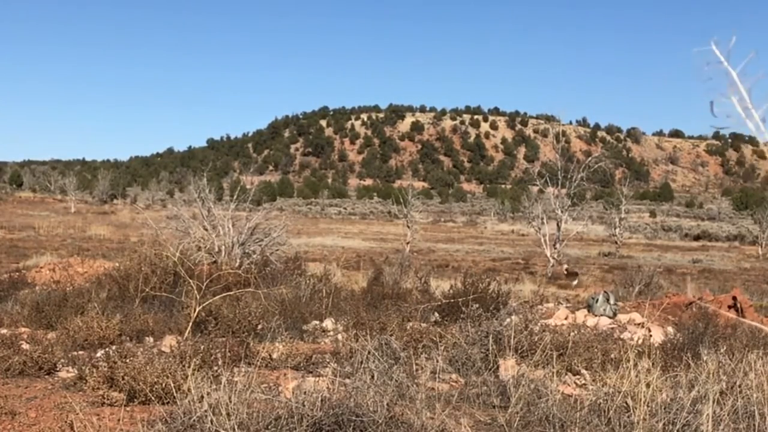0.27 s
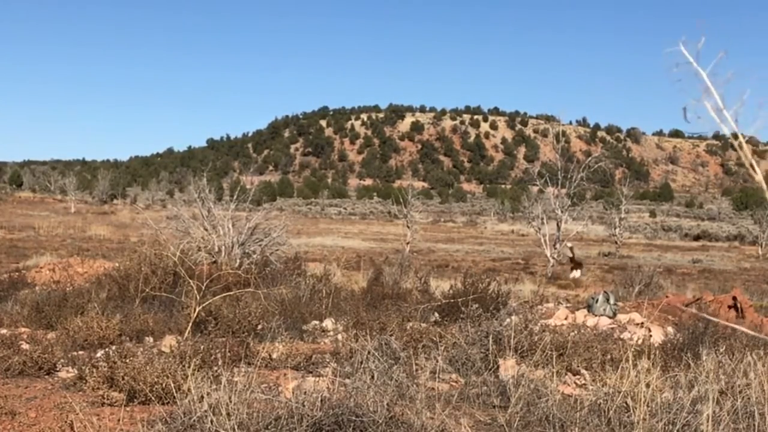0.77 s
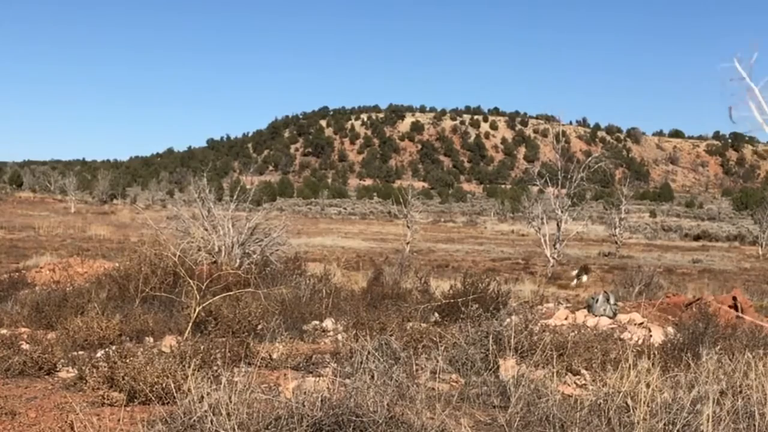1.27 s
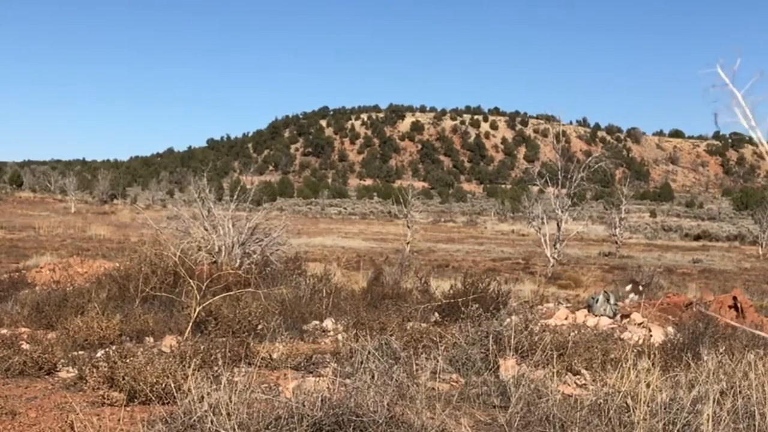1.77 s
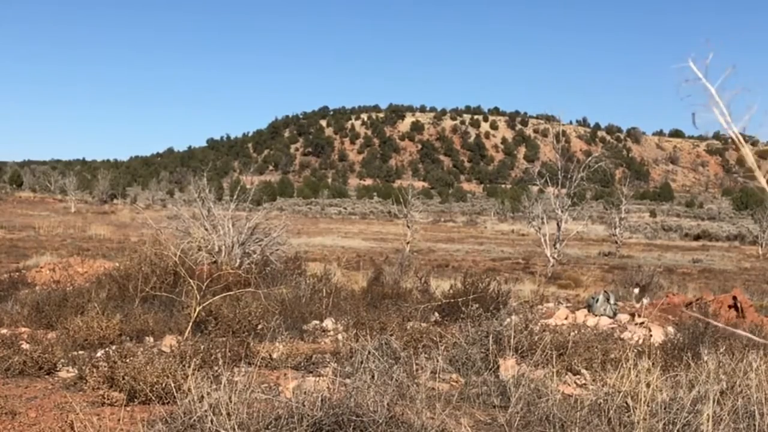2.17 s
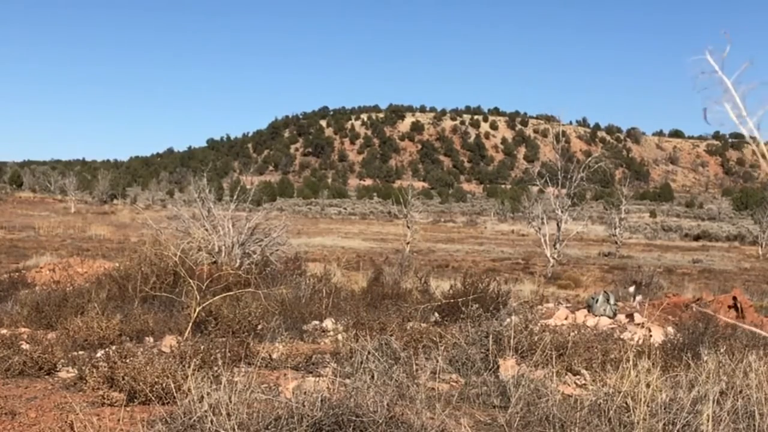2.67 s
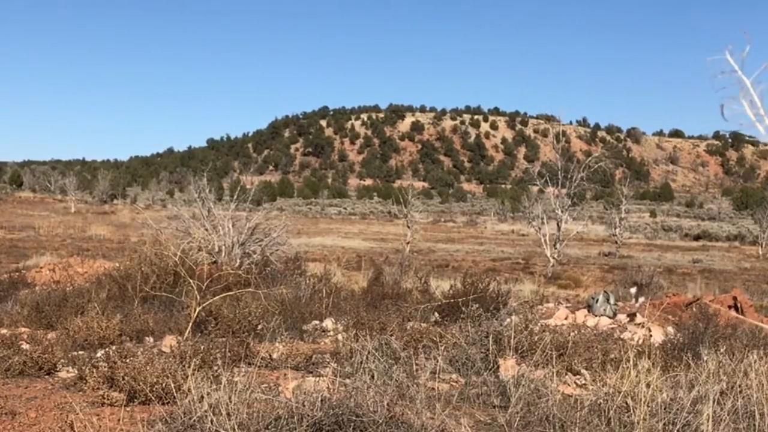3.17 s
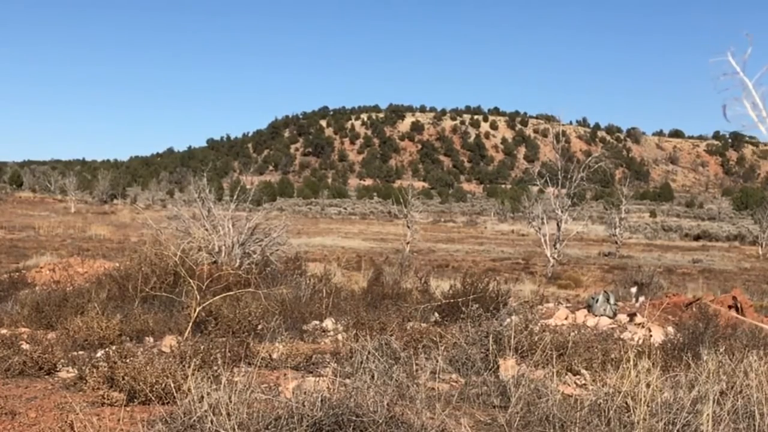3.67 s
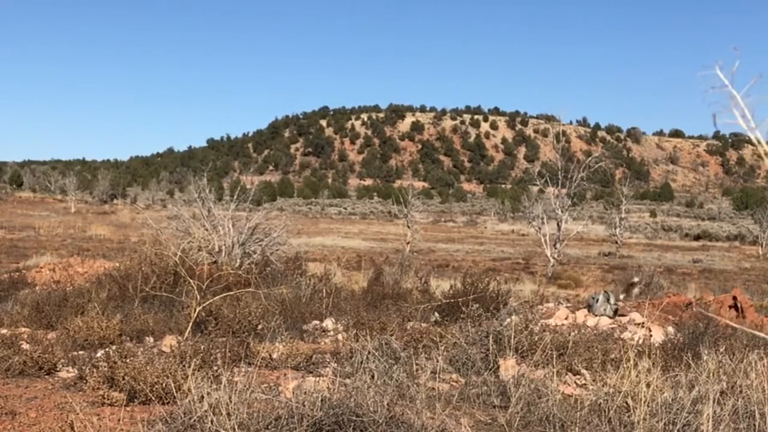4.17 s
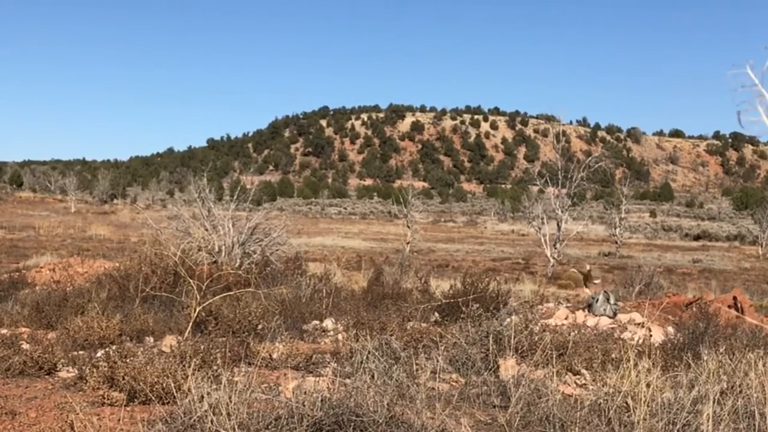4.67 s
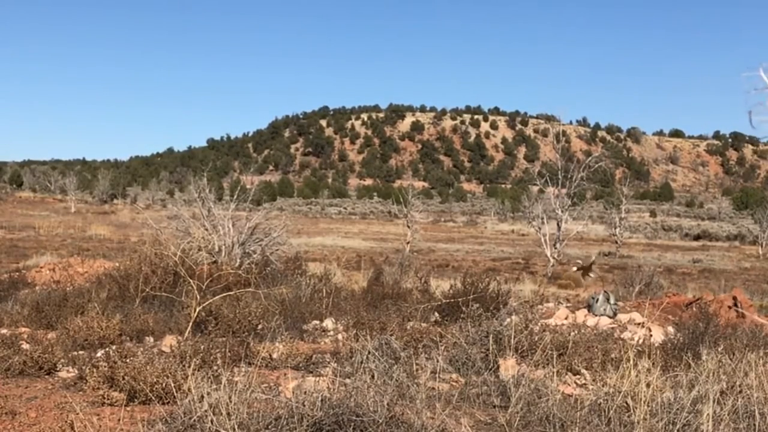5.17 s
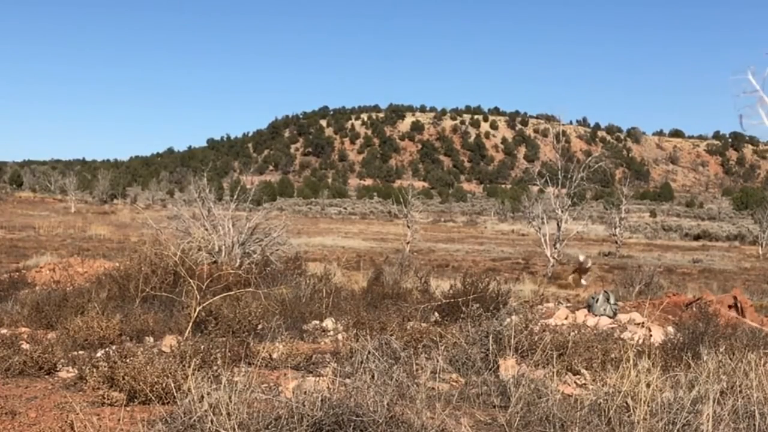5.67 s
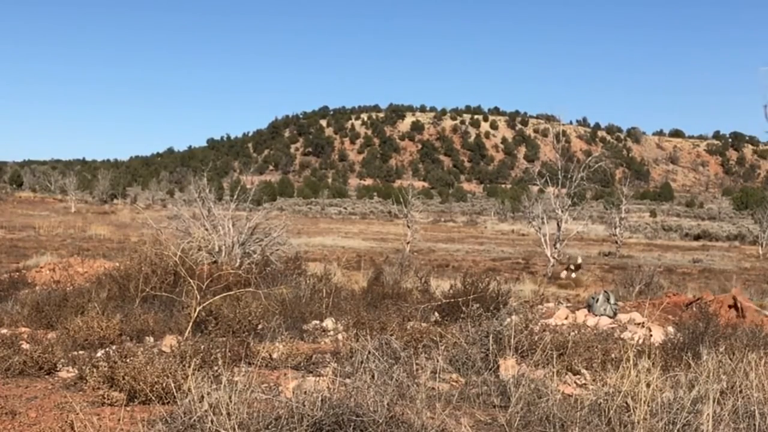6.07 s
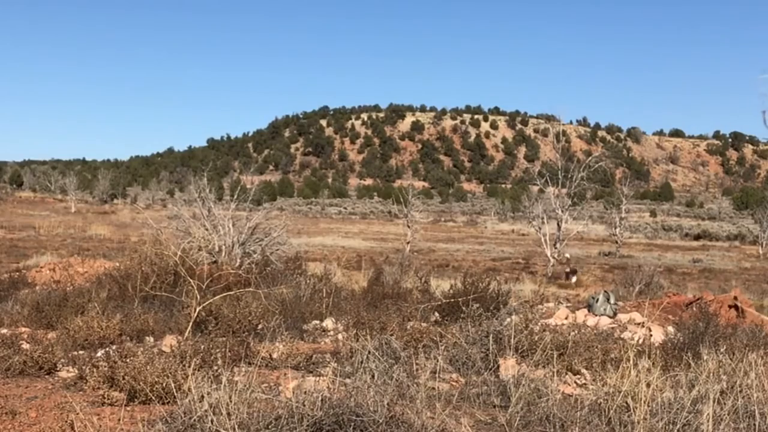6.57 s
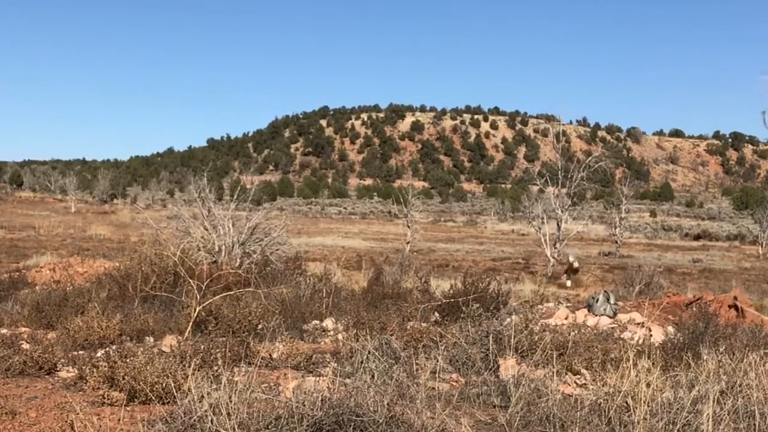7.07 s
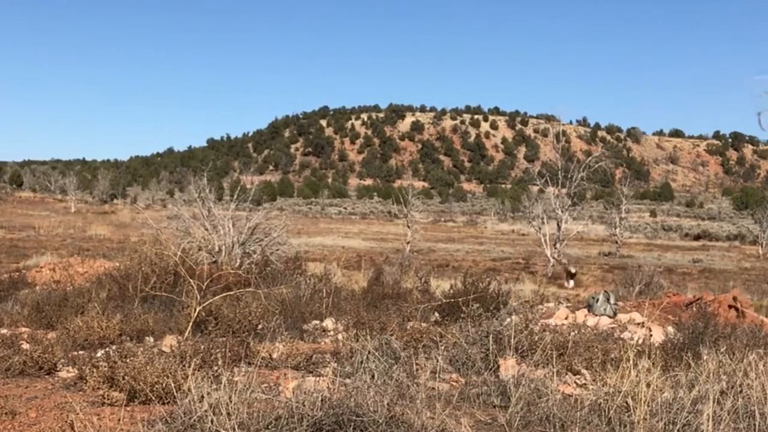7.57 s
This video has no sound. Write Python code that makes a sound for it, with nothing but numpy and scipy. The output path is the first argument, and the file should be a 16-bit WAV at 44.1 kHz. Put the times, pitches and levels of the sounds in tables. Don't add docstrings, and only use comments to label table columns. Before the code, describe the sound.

Open scrubland, a small microphone in gusty wind, coyotes at some distance. From 0 to 0.5 s heavy low thumps and rumble slap the microphone over hoarse growling. At 0.4-0.9 s a far, rough howl jumps up and falls. A faint woof comes at 1.5, a soft bark at 2.1 with a wind thump at 2.2, a stronger bark at 2.7. At 2.9 a dry twig snaps sharply close by with a short rustle, then the loudest bark at 3.15 and a growl. A clear howl climbs in steps from 3.3 to 4.3; another leaps and sinks from 4.5 to 5.1, with a wind slap near 4.8; the longest slides down from 5.4 to 6.6. Thin whines and yips, about three a second, overlap them from 4.3 to 6.2. A deep woof at 6.4, wavering cries and a loud rough yelp around 6.9, wind thumps near 7.1, and muffled calls at 7.35 and 7.6 finish. Faint, dull echo throughout.

```python
import sys
import numpy as np
from scipy import signal
from scipy.fft import rfft, irfft, next_fast_len
from scipy.io import wavfile
from scipy.ndimage import uniform_filter1d

SR = 44100
rng = np.random.default_rng(int(sys.argv[2]) if len(sys.argv) > 2 else 0)


def volts_from_decibels(level):
    exponent = np.asarray(level, float) / 20
    return 10 ** exponent


def dump(signal):
    limited = np.clip(np.atleast_2d(signal).T, -1, 1)
    pcm = np.round(limited * 32767).astype(np.int16)
    wavfile.write(sys.argv[1], SR, pcm)


N = 345303

# pitch_hz [Hz], level_db [dB]
THROAT = [(440, -41.5), (560, -9.5), (660, 0.5), (790, 11.5), (1020, 6.5), (1250, -9), (1600, -6),
          (1850, -15.5), (2250, -17.5), (2700, -30.5), (3300, -24.5), (4000, -49.5), (6500, -50),
          (9000, -76.5)]


def evened(x):
    return x / np.sqrt(np.mean(x ** 2) + 1e-20)


def read(points, hz):
    f, value = np.transpose(points)
    return np.interp(np.log(hz + 1), np.log(f + 1), value)


def add(mix, s, sound):
    part = mix[round(s * SR):][:len(sound)]
    part += sound[:len(part)]


def columns(rows):
    s, *rest = np.transpose(rows)
    t = np.arange(s[0], s[-1], 1 / SR)
    hz, *levels = (np.interp(t, s, c) for c in rest)
    return s[0], [uniform_filter1d(hz, size=700, mode="nearest"), *levels]


def coloured(x, gain):
    size = next_fast_len(len(x) + 2048)
    return irfft(rfft(x, size) * gain(np.fft.rfftfreq(size, 1 / SR)), size)[:len(x)]


def noise(length):
    return rng.standard_normal(length)


def wander(length, top_hz):
    return evened(coloured(noise(length), lambda hz: 1 / (1 + (hz / top_hz) ** 4)))


def faded(x, s):
    return x * signal.windows.tukey(len(x), min(1, 2 * s * SR / len(x)))


def arch(crest, count=11):
    u = np.linspace(0, 1, count)
    return u, abs(np.sin(np.pi * u ** (np.log(.5) / np.log(np.clip(crest, .1, .9)))))


def gusts():
    # time_s [s], rumble_db [dB]
    breeze_points = [(0.0, -38), (.5, -31), (.9, -42), (1.6, -47), (2.5, -38), (3.0, -40), (3.95, -46.5),
                     (4.3, -42.5), (4.6, -49), (4.74, -33.5), (4.9, -45.5), (5.2, -51.5), (5.5, -42.5),
                     (5.95, -62), (6.35, -59), (6.9, -53), (7.3, -54.5), (7.83, -50)]
    # crest_s [s], rumble_db [dB], buffet_db [dB], dying_speed [dB per s]
    gust_list = [(.11, -38, -32.5, 396.5), (0.242, -40, -23.5, 86), (.96, -28.5, -33.5, 406),
                 (1.049, -27, -42, 268), (1.79, -36.5, -48.5, 153), (2.218, -35, -26.5, 355),
                 (2.91, -35.5, -61, 198.5), (3.2, -39.5, -47.5, 204.5), (4.032, -37, -49.5, 40),
                 (4.49, -26.5, -41.5, 209.5), (4.78, -31.5, -45.5, 142.5), (5.08, -42, -53.5, 134),
                 (5.298, -40.5, -62, 398), (5.44, -39.5, -54.5, 89), (6.02, -36, -44.5, 94.5),
                 (6.58, -40, -49.5, 255.5), (7.0, -39, -41, 55), (7.178, -30, -39.5, 359)]
    rise_db_per_s, calm_buffet_db = 551, -15
    t = np.arange(N) / SR
    breeze = volts_from_decibels(np.interp(t, *np.transpose(breeze_points)))
    rumble, buffet = breeze ** 2, (volts_from_decibels(calm_buffet_db) * breeze) ** 2
    for s, rumble_db, buffet_db, dying in gust_list:
        down_db = np.where(t < s, rise_db_per_s * (s - t), dying * (t - s))
        rumble = rumble + volts_from_decibels(rumble_db - np.where(t < s, .35, .7) * down_db) ** 2
        buffet = buffet + volts_from_decibels(buffet_db - down_db) ** 2
    return np.sqrt(rumble), np.sqrt(buffet)


def wind():
    # pitch_hz [Hz], level_db [dB]
    rumble_tone = [(15, -42), (28, -6), (50, 11), (80, 5.5), (120, -4.5), (200, -20.5), (400, -71)]
    buffet_tone = [(50, -24), (100, -7), (140, -0.5), (200, -5.5), (300, -12.5), (450, -30.5), (700, -35),
                   (1200, -81)]
    hiss_tone = [(150, -30.5), (250, -5.5), (476, -11), (987, -11.5), (1240, -7), (1400, -9.5),
                 (1910, -19.5), (6020, -23), (10300, -27.5), (11400, -24.5), (15900, -25.5)]
    hiss_db = -69
    heave, shove = gusts()
    lumps = wander(N, 24)
    steady_rumble = coloured(noise(N), lambda hz: volts_from_decibels(read(rumble_tone, hz)))
    rumble = evened(steady_rumble * volts_from_decibels(3.2 * lumps))
    bursts_db = np.minimum(3.5 * lumps + 3.5 * wander(N, 70), 8)
    buffet = evened(coloured(noise(N) * volts_from_decibels(bursts_db), lambda hz: volts_from_decibels(read(buffet_tone, hz))))
    hiss = evened(coloured(noise(N), lambda hz: volts_from_decibels(read(hiss_tone, hz))))
    return heave * rumble + shove * buffet + volts_from_decibels(hiss_db) * hiss


def harsh(rows, rough, jitter, split_hz=1230):
    start, (hz, effort_db, mouth_db) = columns(rows)
    length = len(hz)
    slack = 1 - hz / hz.max()
    onset = np.exp(-np.arange(length) / SR / .035)
    rough = np.clip(rough + 1.1 * slack + .6 * onset, 0, .9)
    turns = np.cumsum(hz * np.exp(jitter * wander(length, 90))) / SR

    folds = np.zeros(length)
    for k in range(2, 18):
        strength = 0.12 + 1 / (1 + (k * hz / 1700) ** 12)
        folds += np.cos(2 * np.pi * k * turns) * strength * volts_from_decibels(6.77 * wander(length, 19))
    puffs = (1.7 + np.exp(-(turns % 1) / 1.7)) * noise(length)
    breath = evened(coloured(puffs, lambda f: f < 9000))
    drive = (1 - rough) * evened(folds) + rough * .5 * breath

    def below(f):
        return 1 / (1 + (f / split_hz) ** 12)

    low = coloured(drive, lambda f: volts_from_decibels(read(THROAT, f)) * below(f))
    high = coloured(drive, lambda f: volts_from_decibels(read(THROAT, f)) * (1 - below(f)))
    low, high = (v / np.sqrt(abs(uniform_filter1d(v ** 2, size=2200)) + 1e-20) for v in (low, high))
    broken_db = min(45 * jitter, 2.5) * wander(length, 37)
    return start, faded(volts_from_decibels(effort_db + broken_db) * (low + volts_from_decibels(mouth_db) * high), 0.02)


def growls():
    # start_s [s], length_s [s], effort_db [dB]
    bouts = [(0.0, 0.34, -57), (.86, 0.13, -56.5), (1.144, 0.061, -70), (1.729, 0.06, -64.5),
             (2.06, .1, -63), (2.28, 0.14, -66), (2.898, 0.27, -63), (3.32, 0.39, -44), (3.901, .4, -64.5),
             (4.343, 0.13, -65), (4.83, .05, -67), (5.096, 0.2, -64), (5.364, 0.096, -63),
             (6.223, 0.11, -67), (7.083, 0.24, -62), (7.45, .1, -61.5)]
    fade_db_per_s, mutter_db = 223.5, -82
    s = np.arange(0, N / SR, .01)
    start, length, db = np.transpose(bouts)[:, :, None]
    outside = np.maximum(np.maximum(start - s, s - start - length), 0)
    effort_db = np.maximum((db - fade_db_per_s * outside).max(0), mutter_db)
    mouth_db = np.clip(-6.5 - 0.56 * (effort_db + 56.5), -14, 3)
    pitch_hz = 105 + 0 * s
    return [harsh(np.transpose([s, pitch_hz, effort_db, mouth_db]), rough=.75, jitter=.25, split_hz=920)]


def slaps():
    # start_s [s], peak_db [dB], pitch_hz [Hz]
    eddies = [(0.092, -23, 88), (0.127, -23.5, 92), (0.235, -14, 94), (0.259, -11.5, 89.8),
              (0.294, -15.5, 103), (0.339, -18.5, 121), (0.411, -13.5, 110), (0.472, -22, 95),
              (0.628, -29.5, 175), (0.753, -29.5, 90.5), (0.871, -32, 143), (0.941, -26, 92.5),
              (1.028, -26, 91.5), (1.956, -48, 129), (2.206, -15.5, 106), (2.881, -39, 95),
              (4.198, -27.5, 108), (4.285, -50, 93), (4.487, -51, 94), (4.687, -45, 130),
              (4.765, -16.5, 107), (4.799, -19, 104), (5.509, -48, 101), (6.024, -26.5, 104),
              (6.996, -20.5, 94), (7.046, -24, 114), (7.107, -26, 125), (7.148, -26.5, 92)]
    out, t = np.zeros(N), np.arange(2600) / SR
    for s, db, hz in eddies:
        u = t * hz
        swing = np.sin(2 * np.pi * u * (1 - 0.052 * u)) * u * np.exp(-u / 0.43)
        push = noise(len(t)) * u * np.exp(-u / .5)
        puff = coloured(push, lambda f: (f > 150) / (1 + (f / 450) ** 6))
        slap = swing / abs(swing).max() + volts_from_decibels(-14.5) * puff / abs(puff).max()
        add(out, max(s - .002, 0), volts_from_decibels(db) * slap)
    return coloured(out, lambda f: 1 / (1 + (60 / (f + 1)) ** 4) / (1 + (f / 750) ** 6))


def far_howl():
    path = [(0.42, 380.6, -47, -53), (0.486, 385, -35, -28.5), (0.602, 558, -44, -11.5),
            (0.746, 499, -47, -17.5), (0.86, 380.7, -51.5, -31)]
    return [harsh(path, rough=.45, jitter=.075)]


def bark(start, length, top_hz, effort_db, mouth_db, crest, start_db, end_db, swing_db, foot, rough, jitter):
    u, hump = arch(crest)
    tension = arch(.5)[1] ** 2.4
    pitch_hz = top_hz * (foot + (1 - foot) * tension)
    ends_db = np.where(u < crest, start_db, end_db) * (1 - hump)
    rows = [start + length * u, pitch_hz, effort_db + ends_db, mouth_db + swing_db * (1 - hump)]
    return harsh(np.transpose(rows), rough, jitter)


def woofs():
    woof_list = [
        (1.491, 0.13, 498, -59, -12),
        (2.688, .06, 351, -29, -27),
        (3.148, .06, 337.3, -24.5, -15.5),
        (4.089, 0.093, 467, -35, -22.5),
        (6.38, 0.17, 149.3, -38.5, 5),
        (6.946, 0.11, 360, -32.5, -5),
        (7.343, 0.132, 338.7, -38, -22.5),
    ]
    return [bark(*row, crest=.58, start_db=-15, end_db=-27.5, swing_db=2.5, foot=.9, rough=.58, jitter=.05)
            for row in woof_list]


def barks():
    bark_list = [
        (2.106, .145, 427.5, -32.5, -1.5),
        (2.687, 0.13, 492, -27, -1),
        (3.142, .165, 547.6, -17, -11),
    ]
    return [bark(*row, crest=.58, start_db=-17, end_db=-24, swing_db=-5, foot=.68, rough=.18, jitter=.016)
            for row in bark_list]


def twig():
    # start_s [s], peak_db [dB]
    snaps = [(2.3567, -52.5), (2.87, -29.5), (2.8779, -16), (2.8873, -11.5), (2.8906, -13.5), (2.8977, -28),
             (2.903, -46), (2.9287, -42), (2.9522, -41), (3.0678, -58), (3.3454, -74), (3.388, -55.5)]
    # pitch_hz [Hz], level_db [dB], time to fall by 60 dB [s]
    low_modes = [(1200, -6.5, 0.0027), (2040, -10.5, .006), (3300, -10, .01), (4090, -3.5, 0.059),
                 (4500, 6, 0.011), (5700, -12, 0.017), (6760, -3, .008)]
    high_modes = [(8120, -7, 0.022), (9920, 1.5, 0.029), (10900, -13.5, .01), (13700, -13, .006),
                  (15320, -33, .006)]
    high_share = .22
    t = np.arange(3000) / SR
    low, high = (sum(volts_from_decibels(db - 60 * t / t60) * np.sin(2 * np.pi * hz * t) for hz, db, t60 in modes)
                 for modes in (low_modes, high_modes))
    ring = (1 - high_share) * low + high_share * high
    out = np.zeros(N)
    for s, db in snaps:
        tear = noise(600) * np.exp(-t[:600] / .002)
        crack = signal.fftconvolve(tear, ring)
        add(out, s, volts_from_decibels(db) * crack / abs(crack).max())

    t = np.arange(SR // 4) / SR
    rustle = coloured(noise(len(t)), lambda hz: hz / (hz + 1500) / (1 + (hz / 5500) ** 1.3))
    rustle_db = -42.5 - 60 * t / 0.33 + 2.9 * wander(len(t), 120)
    add(out, 2.864, np.minimum(t / 0.012, 1) * volts_from_decibels(rustle_db) * evened(rustle))
    return out


def sung(rows, flutter_db, jitter):
    start, (hz, *levels_db) = columns(rows)
    length = len(hz)
    jitter = jitter + 0.017 * np.exp(-np.arange(length) / SR / 0.036)
    turns = np.cumsum(hz * (1 + jitter * wander(length, 65))) / SR
    flutter_db = flutter_db * np.clip(-(levels_db[0] + 15.5) / 14, .4, 1.8)
    voice = np.zeros(length)
    for k, db in enumerate(levels_db, 1):
        flicker = wander(length, 11.6) + 0.29 * wander(length, 74)
        level = volts_from_decibels(db + k ** 0.51 * flutter_db * flicker)
        voice += level * np.sqrt(2) * np.sin(2 * np.pi * k * turns)
    return start, faded(voice, .008)


def howl(rows):
    # pitch_hz [Hz], level_db [dB]
    muzzle = [(2500, -28), (3000, -21), (3600, -13.5), (4100, -20), (4700, -15), (5500, -20), (7000, -19),
              (9500, -8)]
    step_db = -8.5
    s, hz, first_db, octave_db, edge_db = np.transpose(rows)
    above = [edge_db + read(muzzle, k * hz) + step_db * (k - 3) for k in range(3, 9)]
    return sung(np.transpose([s, hz, first_db, octave_db] + above), flutter_db=2.5, jitter=.003)


def long_howls():
    stepped_path = [(3.285, 812, -50.5, -50, -60), (3.345, 1005, -34.5, -51, -61),
                    (3.6, 1037, -45, -55, -66), (3.65, 1029, -35, -36, -40.5),
                    (3.73, 1075, -44, -61, -74.5), (3.82, 1237, -38, -48, -49.5),
                    (4.08, 1221, -55, -50, -53), (4.17, 1168, -38, -47.5, -46),
                    (4.275, 1153, -37.5, -52.5, -73)]
    short_path = [(4.465, 900, -40.5, -62, -70), (4.506, 1267, -22, -53, -55),
                  (4.551, 1348, -27, -55.5, -53), (4.73, 1195, -34, -49.5, -61.5),
                  (4.82, 1192, -34.5, -46, -62), (4.93, 1131, -32, -52, -44),
                  (4.995, 1034, -30, -45.5, -49.5), (5.065, 1008, -27.5, -38, -52),
                  (5.1, 905, -65, -67.5, -75)]
    long_path = [(5.432, 758, -33, -36.5, -54), (5.49, 1270, -24.5, -51, -43.5),
                 (5.559, 1339, -28, -65, -55.5), (5.72, 1200, -40.5, -77, -85),
                 (5.79, 1131, -34, -41.5, -48), (6.275, 920, -25.5, -37.5, -54.5),
                 (6.438, 960.4, -24.5, -43, -56.5), (6.55, 848.5, -24.5, -38.5, -71),
                 (6.6, 767, -43, -62, -82.5)]
    return [howl(rows) for rows in (stepped_path, short_path, long_path)]


def whine(rows):
    start, tone = sung(rows, flutter_db=3.0, jitter=0.01)
    wave = signal.hilbert(tone)
    octave = (wave ** 2 / (abs(wave) + 1e-9)).real * wander(len(tone), 160)
    return start, tone + volts_from_decibels(-13) * coloured(octave, lambda f: volts_from_decibels(read(THROAT, f)) * (f > 1250))


def arched(start, length, foot_hz, top_hz, db):
    u, hump = arch(.4)
    pitch_hz = foot_hz + (top_hz - foot_hz) * hump
    return whine(np.transpose([start + length * u, pitch_hz, db - 3.5 * (1 - hump)]))


def whines():
    whine_list = [
        (4.266, 0.11, 1005, 1550, -47),
        (4.517, 0.035, 855, 940, -38),
        (5.542, 0.041, 1320, 1410, -33),
        (6.66, .16, 923, 1283, -50.5),
    ]
    return [arched(*row) for row in whine_list]


def yip(end, run, top_hz, run_db, drop_db):
    drop_s, land_hz = .07, 770
    return whine([(end - drop_s - run, .94 * top_hz, run_db),
                  (end - drop_s, top_hz, run_db - 5),
                  (end - .55 * drop_s, land_hz, drop_db),
                  (end, 0.96 * land_hz, drop_db - 19.5)])


def yips():
    yip_list = [
        (4.71, 0.012, 1085, -48, -36),
        (5.0, .015, 1000, -40, -29.5),
        (5.31, 0.11, 1092, -53.5, -40),
        (5.6, .1, 950, -43.5, -33),
        (5.91, 0.07, 910, -39, -38),
        (6.21, .06, 890, -38, -32),
    ]
    return [yip(*row) for row in yip_list]


def cries():
    # time_s [s], pitch_hz [Hz], level_db [dB]
    cry_list = [
        [(6.745, 1071, -53), (6.781, 775, -50.5), (6.85, 735, -41.5)],
        [(6.82, 998, -36.5), (6.87, 1200, -44.5), (6.89, 1510, -36.5), (6.94, 1570, -38.5), (6.965, 1760, -36),
         (7.03, 1414, -49)],
        [(7.07, 1200, -65), (7.13, 1085, -58), (7.17, 876, -45), (7.21, 770, -49)],
    ]
    return [whine(rows) for rows in cry_list]


def yelps():
    yelp_list = [
        (6.798, 0.092, 289.4, -36.5, -12),
        (6.888, 0.13, 440, -21.5, -8),
        (7.559, .17, 445.3, -29.5, -24),
    ]
    return [bark(*row, crest=.46, start_db=-18.5, end_db=-38, swing_db=-6, foot=.76, rough=.3, jitter=.03)
            for row in yelp_list]


def coyotes():
    pack = np.zeros(N)
    for voice in (growls, far_howl, woofs, barks, long_howls, whines, yips, cries, yelps):
        for start, call in voice():
            add(pack, start, call)
    return pack


def hillside(x):
    t = np.arange(SR // 2) / SR
    hits = rng.choice([-1., 1.], len(t)) * (rng.random(len(t)) < 1500 / SR)
    taps = hits * volts_from_decibels(-60 * t / 0.21) * (t > .012)
    tail = coloured(taps, lambda hz: 1 / (1 + (hz / 2500) ** 2))
    return signal.fftconvolve(x, tail / np.linalg.norm(taps))[:N]


def scene():
    near = twig() + slaps() + wind()
    pack = coyotes()
    return (near + pack + volts_from_decibels(-12.5) * hillside(pack))[None]


def band_limit(x):
    return signal.sosfilt(signal.butter(12, 16080, fs=SR, output="sos"), x)


def record(dry):
    edge_hz = 15750
    low_pass = signal.firwin(511, edge_hz, window=("kaiser", 9), fs=SR)
    narrow = signal.oaconvolve(dry, low_pass[None], "same")
    return band_limit(narrow)


dry = scene()
out = record(dry)
dump(out)
```